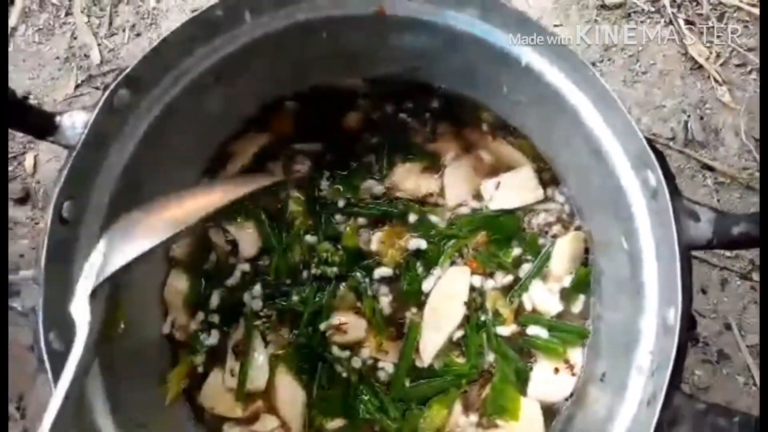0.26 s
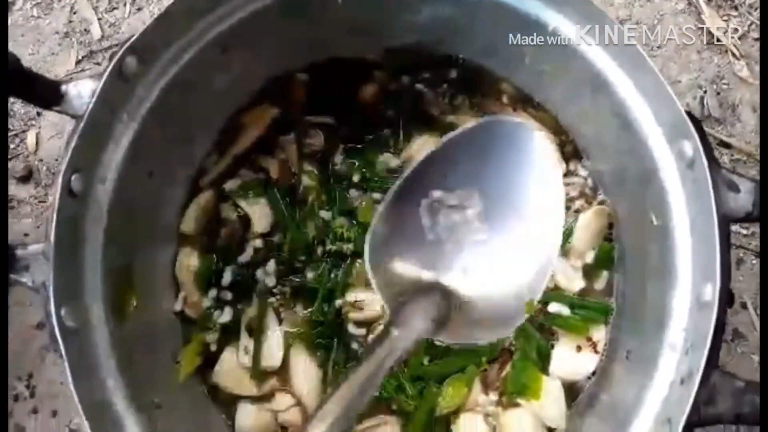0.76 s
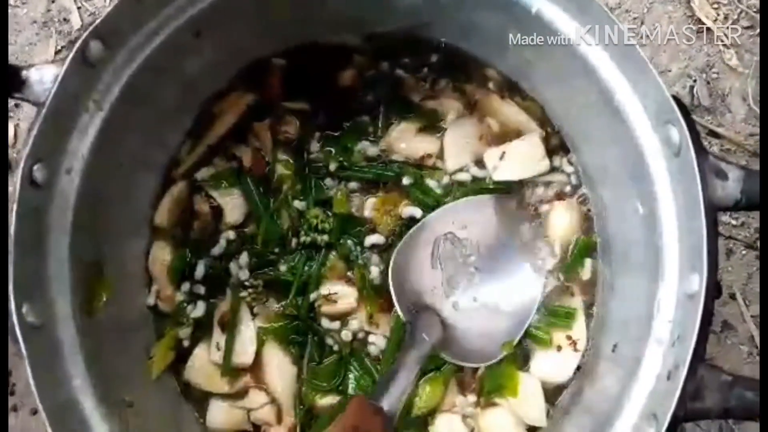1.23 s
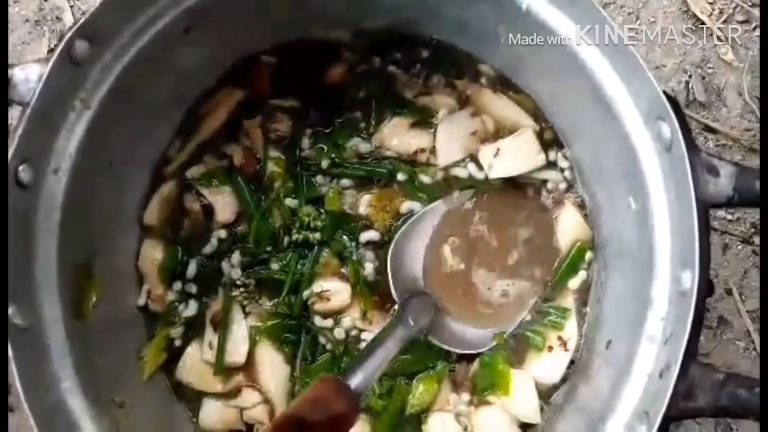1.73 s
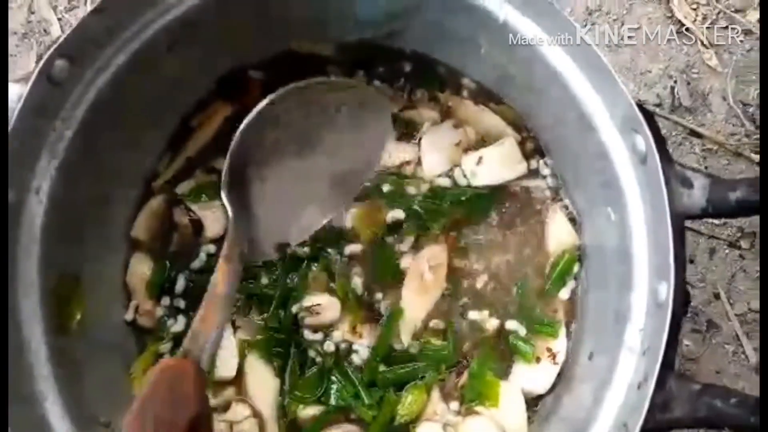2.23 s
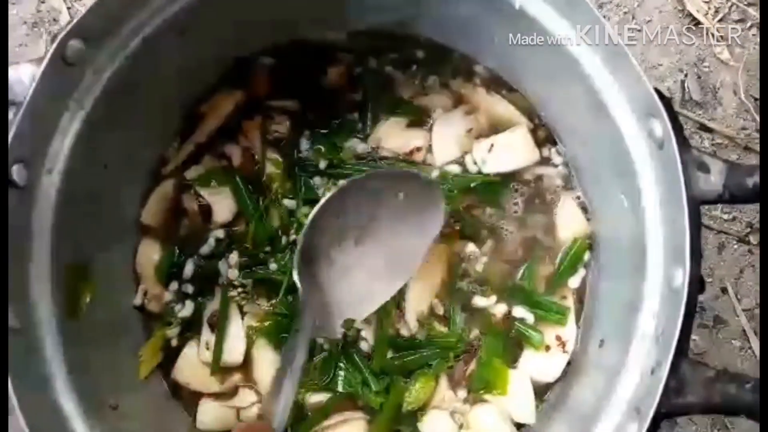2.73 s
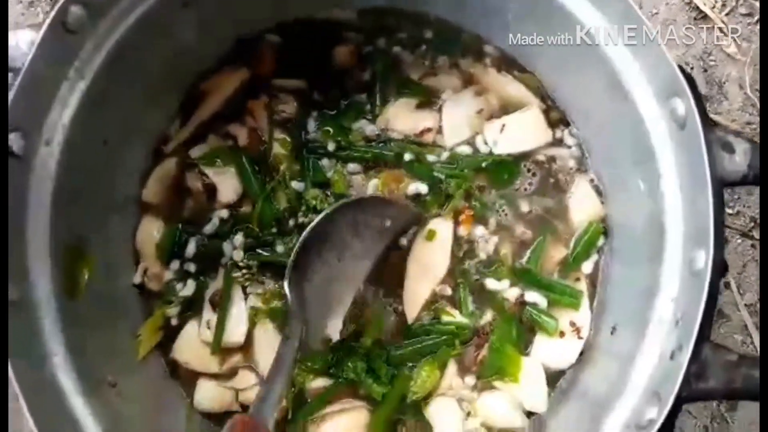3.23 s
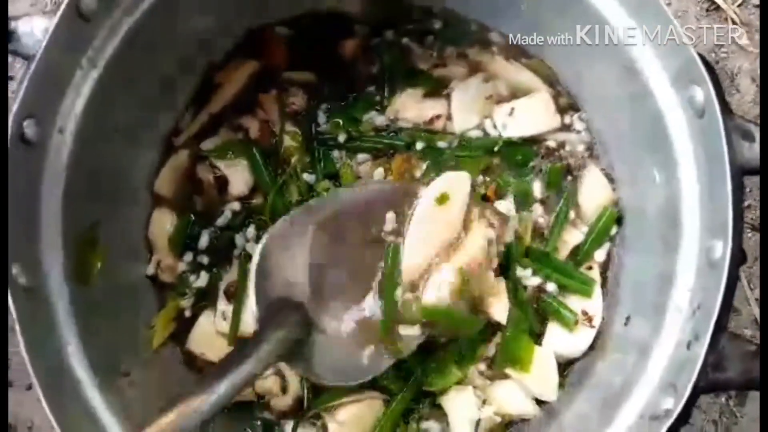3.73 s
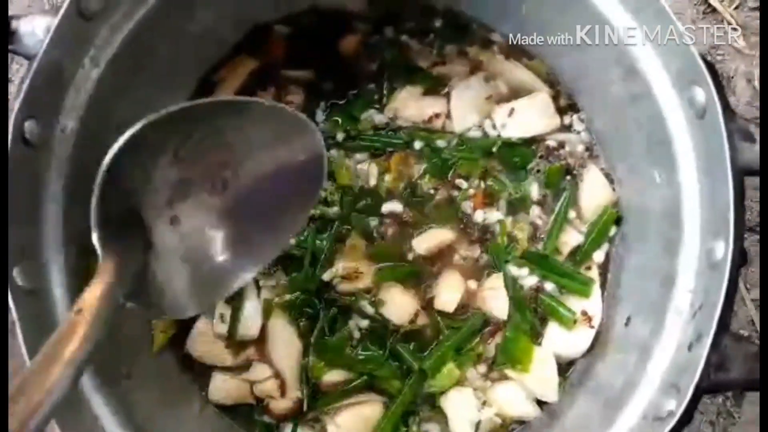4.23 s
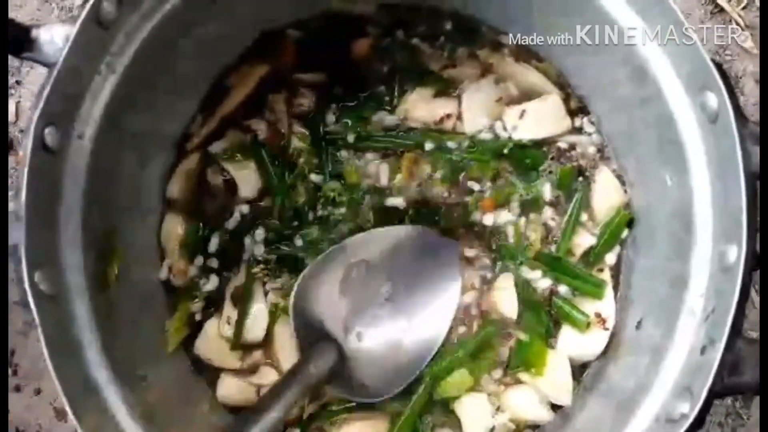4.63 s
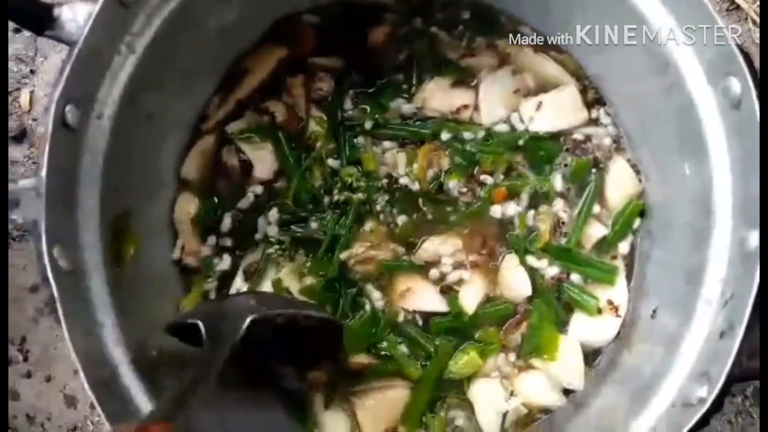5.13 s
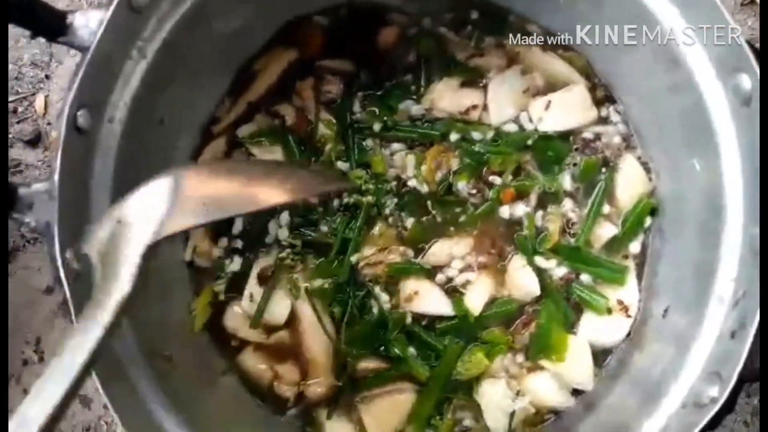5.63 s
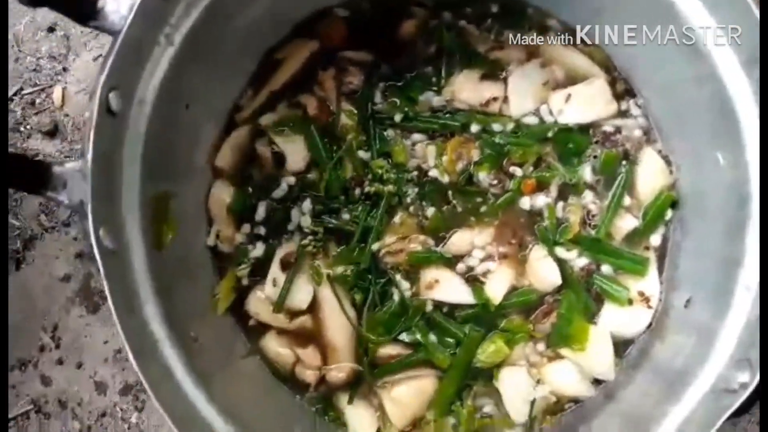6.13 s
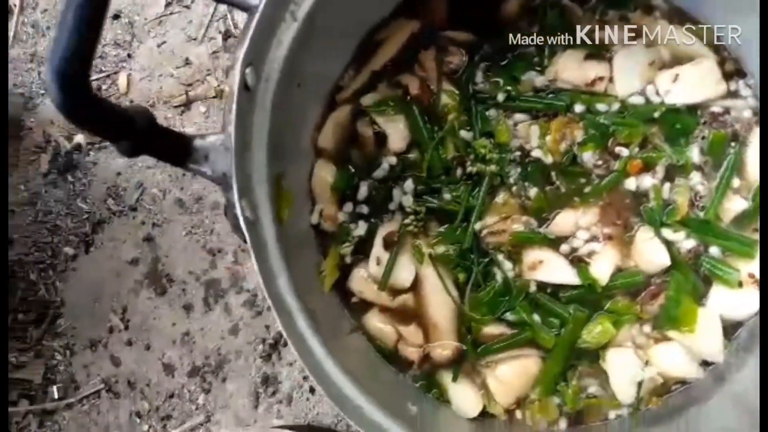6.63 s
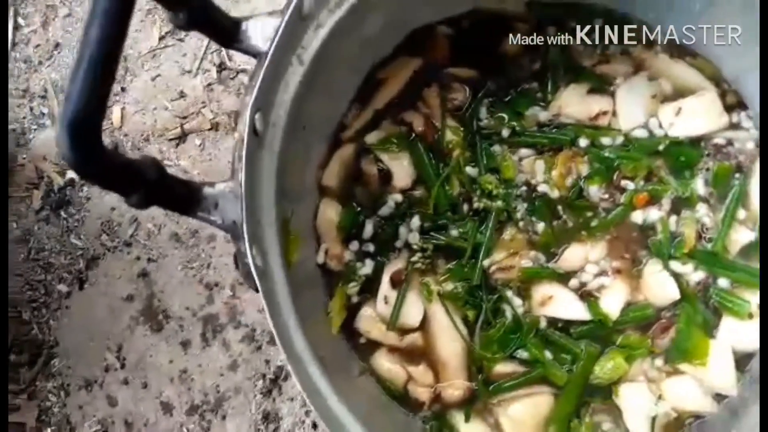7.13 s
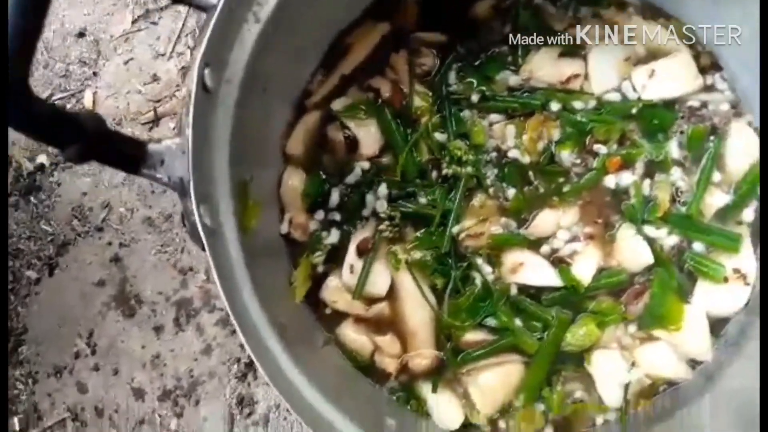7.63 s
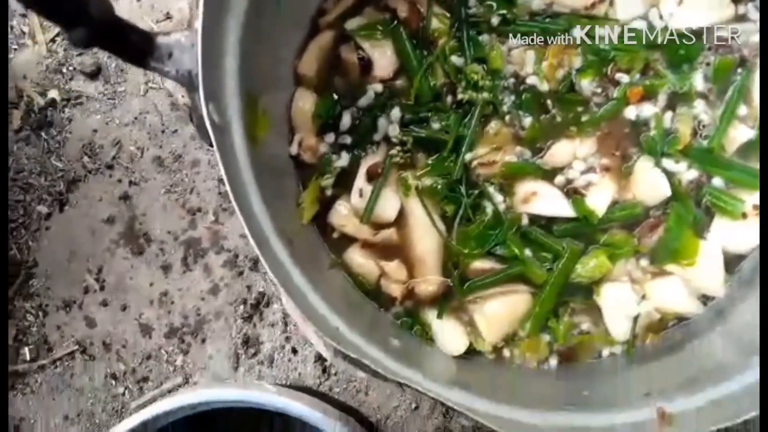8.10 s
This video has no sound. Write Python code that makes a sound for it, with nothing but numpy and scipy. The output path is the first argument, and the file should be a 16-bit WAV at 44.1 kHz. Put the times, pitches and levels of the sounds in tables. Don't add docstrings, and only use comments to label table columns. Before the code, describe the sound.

A gentle, hollow simmer runs throughout, slowly growing, in quiet open air with scattered thin bird whistles and chips. Soft ladle scrapes and tiny clicks lead to one sharp metallic knock. Later, bright metal tableware is struck beside the pot: a ringing bowl, rattling dishes, a short cup clack, rough scraping and a bouncing lid. The small close microphone sounds dry, with limited treble and light breeze rumble.

```python
import sys
import numpy as np
from scipy import signal
from scipy.fft import rfft, irfft
from scipy.io import wavfile

SR = 44100
rng = np.random.default_rng(int(sys.argv[2]) if len(sys.argv) > 2 else 0)


def generate_wav(sig):
    pcm = np.round(np.clip(np.atleast_2d(sig).T, -1, 1) * 32767).astype(np.int16)
    wavfile.write(sys.argv[1], SR, pcm)


def gain_from_db(level_db):
    decades = np.asarray(level_db, float) / 20
    return 10 ** decades


N = 368676

# [f/Hz, density/dB]
AIR = [(15, -56), (25, -30.5), (86, -25), (254, -27.5), (366, -26.5), (573, -11), (766, -10.5), (971, -28),
       (1440, -27), (12200, -34.5), (13500, -56)]
AIR_DB = -78.5
# [f/Hz, density/dB]
RUMBLE_SPECTRUM = [(15, -39), (25, -6), (64, -5), (102, 0), (150, -8.5), (172, -4), (220, -13),
                   (290, -45.5), (480, -120)]
# [t/s, level/dB, 20 dB rise/s, 20 dB fall/s]
PUFFS = [
    (3.14, -77.5, 0.1, 0.087),
    (3.44, -78, 0.2, 0.56),
    (4.2, -83.5, .5, 0.43),
    (4.57, -73, 0.13, 0.25),
    (4.94, -64, .07, 0.19),
    (6.31, -67, 0.06, .2),
    (6.72, -73.5, 0.2, 0.38),
    (7.85, -79, 0.3, 0.72),
]
CALM_DB = -95

# [t/s, length/s, level/dB]
RISERS = [
    (0.584, 0.17, -63),
    (2.222, .14, -64),
    (3.001, 0.17, -61),
]
RISER_FROM_HZ, RISER_TO_HZ, RISER_BEND = 3800, 6850, 1.7
# [t/s, length/s, f/Hz, level/dB]
HELD = [
    (.03, 0.034, 6900, -74),
    (.75, .063, 6800, -83),
    (2.33, 0.06, 6900, -78),
    (2.995, .13, 7020, -77),
    (5.062, .15, 7130, -78),
]
SAG_HZ_PER_S = 500
# [t/s, length/s, first f/Hz, last f/Hz, level/dB]
CHIPS = [
    (0.0, .02, 4540, 6500, -58.5),
    (1.025, 0.023, 5670, 7160, -54.5),
    (3.97, .045, 5850, 6600, -63),
    (4.205, 0.019, 5900, 5380, -63.5),
    (6.127, .019, 6380, 6600, -52.5),
    (6.856, 0.019, 4320, 4750, -58),
]
# [t/s, length/s, first f/Hz, last f/Hz, level/dB, bend]
DRIP = [
    (6.89, .022, 1000, 1450, -46, 1.1),
]
YARD_T60_S, TREES_T60_S = 0.36, 0.24

# [t/s, level/dB]
SIMMER = [(0.0, -64.5), (0.32, -66), (0.63, -62), (1.16, -59), (2.19, -59.5), (2.65, -57.5), (3.51, -55.5),
          (3.68, -59.5), (4.12, -60), (4.9, -55), (5.68, -57), (7.0, -55.5), (8.36, -56)]
# [f/Hz, density/dB]
BUBBLING = [(130, -61), (220, -19), (292, -22), (409, -8.5), (592, 2.5), (705, -1.5), (911, -18),
            (994, -28.5), (1100, -24), (1430, -53), (2420, -120)]
# [t/s, peak level/dB, f/Hz]
POPS = [(1.207, -42, 618), (1.516, -42.5, 516), (1.989, -46, 604), (2.461, -44, 600), (3.341, -48, 574),
        (3.96, -41.5, 592), (4.03, -44, 444), (4.244, -43.5, 606), (4.451, -45.5, 550), (4.481, -43, 630),
        (5.059, -42, 547), (5.084, -40.5, 570), (5.547, -46, 686), (5.69, -43, 545)]
# [f/Hz, width/Hz]
WALL = [
    (1190, 55),
    (1860, 80),
    (2360, 29),
]
# [t/s, peak level/dB, 20 dB fade/s]
RUBS = [
    [(.28, -77, .08), (1.38, -73, 0.14), (1.65, -76, 0.2), (2.17, -64.5, 0.18), (2.4, -77, 0.15),
     (2.69, -73, .1), (3.1, -75, .5), (3.57, -70.5, 0.65), (4.0, -72, 0.3), (4.25, -71, 0.4),
     (4.75, -72.5, 0.3), (5.1, -66, .5), (5.66, -69, 0.07), (6.05, -78.5, 1)],
    [(.93, -85.5, 0.6), (1.15, -78, 0.23), (3.02, -71.5, 0.2), (3.42, -73, 0.18), (4.84, -76, 0.37),
     (5.0, -66, 0.26), (5.29, -82, 0), (6.2, -83, 0.6)],
    [(1.65, -83, 0.1), (2.12, -85, 0.7), (2.92, -76, .3), (4.084, -73, 0.07), (5.0, -73, 0.3),
     (5.98, -83, 0.5)],
]
RUB_REST_DB = -97
# [t/s, peak level/dB, centre f/Hz, spread/octaves, crack level/dB]
TICKS = [(1.054, -53, 1700, .5, -80), (2.069, -51, 3780, 0.31, -54.5), (2.070, -56, 12300, .12, -83),
         (3.848, -47.5, 12400, .1, -82), (4.566, -48, 12900, .07, -80), (3.847, -37.5, 1760, 0.59, -45.5),
         (3.876, -58, 4200, 0.4, -58), (3.893, -40, 3000, 0.5, -55), (3.925, -58, 3630, 0.54, -64),
         (4.021, -66, 2190, 0.25, -52), (3.848, -52, 7100, .12, -80), (3.859, -52, 2200, .1, -80),
         (3.899, -57, 7200, .2, -65), (4.113, -62, 4500, .08, -85), (4.566, -46, 9800, .3, -80),
         (4.897, -30, 7800, .12, -70), (4.898, -36, 11000, .25, -70), (4.9145, -40, 7000, .3, -60),
         (4.079, -54, 2180, 0.078, -63), (4.089, -50, 2730, 0.16, -60), (4.104, -56, 11900, .12, -78),
         (5.008, -52.5, 3020, 0.59, -60), (5.035, -54, 2770, 0.46, -61), (5.275, -63, 1700, 0.078, -82),
         (8.002, -49, 9600, 0.2, -51), (8.346, -56, 3730, 0.11, -52)]
TICK_RING_S, TICK_CYCLES = 0.016, 73

# [t/s, level/dB, 20 dB rise/s, 20 dB fall/s]
DRAG = [(7.01, -57.5, 0.4, 0.24), (7.31, -52, 0.1, 0.3), (7.35, -52.5, .2, .07), (7.47, -62.5, .07, .5),
        (7.61, -51.5, .3, .4), (7.69, -50.5, 0.3, 0.08), (7.809, -43, 0.1, 0.0091), (7.98, -56, .3, 0.11),
        (8.17, -56, 0.2, .15), (8.26, -56, 0.2, 0.028), (8.31, -50, 0.1, 0.084)]
# [f/Hz, density/dB]
DRAG_TONE = [(88, -47), (150, -7.5), (254, -0.5), (564, -15), (870, 0.5), (983, 6.5), (1420, -5),
             (2070, -7), (2430, 3), (3800, -37), (4940, -54), (8360, -120)]
# [f/Hz, density/dB]
DRAG_GRIT = [(2060, -26), (3200, -6), (3830, -12), (4460, 0), (5000, -2), (5850, -23), (6300, 2),
             (6630, -6.5), (7090, -0.5), (7980, -2), (10500, -10.5), (12500, -6), (13500, -25)]
# [f/Hz, width/Hz, level/dB]
GRIT_TONES = [(3250, 83, -0.5), (3820, 20, -16), (4100, 30, -13), (4300, 18, -7), (4360, 38, -8),
              (4560, 51, -2), (5150, 100, -4), (5610, 110, -20), (6500, 81, 0.5), (6760, 25, -8),
              (7680, 35, -4), (8240, 38, -6), (8870, 62, -15), (9300, 42, -12), (9700, 31, -21),
              (9900, 81, -18), (10700, 86, -19), (11300, 43, -29), (12300, 140, -25)]
GRIT_DB, GRIT_FOLLOWS = -59, 1.45

# [t/s, peak level/dB]
JOLTS = [
    (6.615, -52),
    (6.724, -49),
    (6.90, -58),
    (7.219, -55),
    (7.812, -58),
]
# [f/Hz, level/dB, t60/s]
BOWL_HUM = [(950, -8, .7), (1547, 0, 1.2), (2178, -7, .6), (2494, -6, .5), (2690, -8, .6), (2943, -12, .4),
            (4046, -18, .3)]

# [f/Hz, density/dB]
CRACK = [(2710, -36), (4600, -11), (4980, -9.5), (5460, -13), (6540, 0), (6910, -3), (7940, -3),
         (10400, -12.5), (12200, -14), (13300, -23.5), (13900, -51.5)]
# [t/s, body level/dB, knock level/dB, crack level/dB, rattle/s]
POT_KNOCKS = [
    (1.0511, -42, -61, -37.5, 0.049),
    (1.0634, -51, -67, -49.5, 0.018),
    (4.565, -36, -43.5, -36.5, 0.042),
    (4.5752, -45, -51, -46.5, 0.039),
]
LADLE_TAPS = [
    (4.8915, -41, -46, -70, 0.018),
    (4.8966, -7.5, -14.5, -16, 0.08),
    (4.914, -18, -31.5, -31, 0.03),
]
BOWL_HITS = [
    (6.3017, -5, -22, -10, 0.069),
    (6.3299, -21.5, -35.5, -32, 0.12),
]
DISH_HITS = [(6.6126, -21.5, -38, -25, 0.06), (6.6178, -17.5, -35, -27.5, 0.14),
             (6.6338, -18.5, -17, -37, 0.026), (6.640, -20, -24, -44, 0.21),
             (6.7221, -15.5, -32, -19, 0.033), (6.7245, -13.5, -28, -17, 0.026),
             (6.730, -12.5, -26, -27, 0.044), (6.737, -19, -27, -28.5, 0.11),
             (6.7565, -19, -28, -26, 0.045), (6.767, -23.5, -28, -39, 0.072),
             (6.7805, -26, -34.5, -37, 0.14), (8.096, -24, -29, -32.5, 0.15),
             (8.2709, -32, -41.5, -46, 0.13)]
LID_HITS = [
    (7.803, -38, -34, -60, 0.027),
    (7.8075, -23, -23, -32, 0.026),
    (7.8105, -7.5, -12.5, -17.5, 0.06),
    (7.8163, -6.5, -25, -21, 0.068),
    (7.8274, -10, -27, -26.5, 0.075),
    (7.8414, -17, -25, -41, 0.082),
    (7.8539, -19, -25, -44, 0.1),
    (7.8716, -21.5, -28, -43, 0.13),
    (7.8974, -30, -30, -56, 0.056),
]
CUP_HITS = [
    (7.2125, -47, -41, -70, .03),
    (7.2172, -14, -18.5, -36, 0.038),
    (7.2213, -14, -28.5, -33.5, 0.072),
    (7.236, -22.5, -44, -42, .09),
]
# [f/Hz, level/dB, t60/s]
LADLE = [(947, -23, 0.13), (1222, -1, 0.062), (1766, 1, 0.068), (2010, -7, .05), (2304, -2, 0.055),
         (2460, -7, .05), (2665, -27, 0.11), (3031, -25, 0.097), (5093, -30, 0.069), (6132, -12, 0.059),
         (7779, -42, 0.13)]
# [f/Hz, level/dB, t60/s]
BOWL = [(290, -36, 2.4), (668, -32, 1.6), (829, -31, .36), (953, -27, .33), (1545, -24, 1.1),
        (1552.5, -18, .45), (1760, -37, .5), (1900, -38, .5), (2180, -4, .48), (2390, -8, .14),
        (2560, -33, .4), (2767, -15, .32), (2781, -21, .25), (2939, -20, .38), (2951, -24, .36),
        (3241, -10, .16), (3252, -38, .6), (3365, -20, .19), (3374, -39, .6), (4043, -26, .22),
        (4447, -31, .26), (4888, -26, .18), (5130, -18, .076), (6342, -13, .1), (6476, -21, .13),
        (7020, -29, .15), (7763, -15, .08), (8899, -18, .07)]
# [f/Hz, level/dB, t60/s]
DISH = [(608, -6, .17), (1082, -5, .15), (1200, -8, .1), (1545, -22, .5), (1771, -4, .14), (1938, -5, .15),
        (2309, 0, .18), (2385, -3, .22), (2509, 0, .23), (2620, -5, .15), (2686, -19, .45),
        (2794, -10, .18), (4640, -16, .18), (5329, -22, .2), (5674, -20, .14), (6164, -16, .11),
        (7025, -14, .12), (8877, -19, .1)]
# [f/Hz, level/dB, t60/s]
LID = [(678, -18, 0.26), (1147, -24, 0.42), (1545, -23, 0.6), (2175, -29, 0.71), (2358, 0, 0.1),
       (2422, -13, 0.25), (2492, -3, 0.2), (2686, -25, 0.72), (2789, -18, 0.4), (2939, -13, 0.28),
       (3214, -17, 0.24), (3391, -28, 0.22), (3682, -31, 0.23), (3817, -23, 0.19), (4043, -17, 0.22),
       (4409, -17, 0.13), (4829, -19, 0.13), (5125, -25, 0.2), (6643, -20, 0.18), (7833, -42, 0.28)]
# [f/Hz, level/dB, t60/s]
CUP = [(1200, -29, 0.15), (1680, -17, 0.16), (1895, -23, 0.15), (2500, -11, 0.13), (2519, 0.5, 0.054),
       (2740, -16, 0.21), (3300, -31, 0.1), (3811, -23, 0.09), (4100, -13, 0.11), (4231, -11, 0.067),
       (4500, -16, 0.078), (5685, -37, 0.14), (6261, -28, 0.14), (7860, -30, 0.088),
       (1545, -28.5, 0.49), (2690, -24, 0.39), (7900, -14, .05), (6500, -15, 0.068)]


def rms_one(x):
    return x / np.sqrt(np.mean(x ** 2) + 1e-20)


def peak_one(x):
    return x / np.max(np.abs(x))


def drift(rate):
    r = np.exp(-80 * np.pi * rate / SR)
    slow = signal.lfilter([1], [1, -2 * r, r * r], rng.standard_normal(N // 40 + 2002))[2000:]
    return np.interp(np.arange(N) / 40, np.arange(len(slow)), rms_one(slow))


def swells(rows, rest_db):
    t = np.arange(0, N + 64, 64) / SR
    levels = [np.full(len(t), rest_db)]
    for s, peak_db, *sides in rows:
        distance = np.where(t < s, (s - t) / sides[0], (t - s) / sides[-1])
        levels.append(peak_db - 20 * distance)
    return np.interp(np.arange(N) / SR, t, np.max(levels, axis=0))


def coloured(x, spectrum):
    hz, level_db = np.transpose(spectrum)
    bins = np.maximum(np.arange(len(x) // 2 + 1) * SR / len(x), 1)
    weight = gain_from_db(np.interp(np.log(bins), np.log(hz), level_db, left=-90, right=-90))
    return rms_one(irfft(rfft(x) * weight, len(x)))


def band(x, low_hz, high_hz):
    sos = signal.butter(2, [low_hz, min(high_hz, .45 * SR)], "band", fs=SR, output="sos")
    return signal.sosfilt(sos, x)


def ring(clicks, hz, t60):
    r, w = gain_from_db(-60 / (t60 * SR)), 2 * np.pi * hz / SR
    return signal.lfilter([0, np.sin(w)], [1, -2 * r * np.cos(w), r * r], clicks + 1e-18)


def grains(size, per_s, spread_db):
    strength = gain_from_db(spread_db * np.minimum(rng.exponential(1, size), 5))
    sign = rng.choice([-1, 1], size)
    return strength * sign * (rng.random(size) < per_s / SR)


def contact(length, rattle):
    t = np.arange(int(length * SR)) / SR
    force = grains(len(t), 1500, spread_db=3.0) + .6 * rng.standard_normal(len(t))
    shape = gain_from_db(-60 * t / max(rattle, .004)) + 2.4 * np.exp(-t / 0.001)
    return force * shape * np.minimum(t / 0.0013, 1) ** 2


def crack(force):
    colour = coloured(signal.unit_impulse(256, 128), CRACK)
    return peak_one(np.convolve(force, colour)[128:128 + len(force)])


def echoes(x, t60, cut_hz, hold):
    t = np.arange(int(.8 * SR)) / SR
    shape = gain_from_db(-60 * np.maximum(t - hold, 0) / t60) * np.minimum(t / 0.0027, 1)
    tail = band(rng.standard_normal(len(t)), 230, cut_hz) * shape
    return signal.fftconvolve(x, tail / np.sqrt(np.sum(tail ** 2)))[:N]


def open_air():
    return gain_from_db(AIR_DB + 4.5) * coloured(rng.standard_normal(N), AIR)


def breeze():
    rumble = coloured(rng.standard_normal(N), RUMBLE_SPECTRUM) * gain_from_db(2 * drift(5))
    return gain_from_db(swells(PUFFS, CALM_DB) + 11.0) * rms_one(rumble)


def bird_notes():
    risers = [(s, length, RISER_FROM_HZ, RISER_TO_HZ, db, RISER_BEND) for s, length, db in RISERS]
    held = [(s, length, hz, hz - SAG_HZ_PER_S * length, db, 1) for s, length, hz, db in HELD]
    return risers + held + [(*chip, 1) for chip in CHIPS]


def glides(notes, waver_db):
    out, waver = np.zeros(N), gain_from_db(waver_db * drift(40))
    for s, length, first_hz, last_hz, level_db, bend in notes:
        u = np.linspace(0, 1, int(length * SR))
        phase = 2 * np.pi * np.cumsum(first_hz + (last_hz - first_hz) * u ** bend) / SR
        out[round(s * SR):][:len(u)] += gain_from_db(level_db) * np.sin(phase) * np.sin(np.pi * u) ** 0.21
    return out * waver


def simmer():
    collapses = grains(N, 500 * gain_from_db(4 * drift(8.3)), spread_db=1.5)
    pitches, dealt = np.geomspace(330, 950, 16), rng.integers(0, 16, N)
    large_db, small_db = 5 * drift(3.4), 5 * drift(4.1)
    lean = np.abs(np.linspace(-1, 1, 16))
    rings = np.zeros(N)
    for k, hz in enumerate(pitches):
        share_db = lean[k] * (large_db if k < 8 else small_db)
        rings += ring(collapses * (dealt == k) * gain_from_db(share_db), hz, 12.0 / hz)
    water = rms_one(rings) + 0.69 * rms_one(band(rng.standard_normal(N), 180, 1300))
    s, level_db = np.transpose(SIMMER)
    water = gain_from_db(np.interp(np.arange(N) / SR, s, level_db)) * coloured(water, BUBBLING)
    for s, peak_db, hz in POPS:
        burst = ring(band(signal.unit_impulse(SR // 4), hz / 1.4, hz * 1.4), hz, 18.0 / hz)
        water[round(s * SR):][:SR // 4] += gain_from_db(peak_db - 3.0) * peak_one(burst)
    return water


def stirring():
    rub, out = grains(N, 1400, spread_db=4.5), np.zeros(N)
    for (hz, width_hz), strokes in zip(WALL, RUBS):
        t60 = 2.2 / width_hz / 2
        tone = ring(ring(rub, hz, t60), hz, t60)
        out += gain_from_db(swells(strokes, RUB_REST_DB) - 1.5 + 3 * drift(12)) * rms_one(tone)
    return out


def ticks():
    out = np.zeros(N + SR)
    for s, peak_db, hz, octaves, crack_db in TICKS:
        force = contact(.15, TICK_RING_S + TICK_CYCLES / hz)
        ratio = 2 ** max(octaves, .03)
        patch = band(band(force, hz / ratio, hz * ratio), hz / ratio, hz * ratio)
        sound = gain_from_db(peak_db) * peak_one(patch) + gain_from_db(crack_db + 0.5) * crack(force)
        out[round(s * SR):][:len(force)] += sound
    return out[:N]


def dragging():
    drag_db = swells(DRAG, rest_db=-90)
    grit_db = GRIT_DB + GRIT_FOLLOWS * (drag_db + 53)
    start = round(6.8 * SR)
    grit = grains(N - start, 3000 * gain_from_db(2.8 * drift(25)[start:]), spread_db=2.0)
    body = sum(gain_from_db(db) * ring(grit, hz, t60 * 3.8) for hz, db, t60 in LID)
    tone = coloured(grit, DRAG_TONE) + 0.54 * rms_one(body)
    high = 1.3 * coloured(grit, DRAG_GRIT)
    for hz, width_hz, level_db in GRIT_TONES:
        wander_db = level_db * 0.91 - 5 + 3.6 * drift(8.3)[start:]
        high += gain_from_db(wander_db) * rms_one(ring(grit, hz, 2.2 / max(width_hz, 15)))
    drag = gain_from_db(drag_db[start:] - 1.5) * tone + gain_from_db(grit_db[start:]) * rms_one(high)
    return np.r_[np.zeros(start), drag]


def humming():
    start = round(6.6 * SR)
    out, chance = np.zeros(N), rng.normal(0, 2.0, (len(JOLTS), len(BOWL_HUM)))
    s, peak_db = np.transpose(JOLTS)
    for (hz, level_db, t60), vary_db in zip(BOWL_HUM, chance.T):
        clicks = np.zeros(N - start)
        clicks[(s * SR).astype(int) - start] = gain_from_db(peak_db + level_db + vary_db)
        out[start:] += ring(clicks, hz, t60)
    return out


def blows(hits, modes, ring_db, noise_db, damping, split_hz, twin, size, thud_db, touch_s, crack_s):
    out = np.zeros(N + SR)
    for s, body_db, knock_db, crack_db, rattle in hits:
        force = contact(size, rattle)
        samples = np.arange(len(force))
        noise = band(force, 2100, 2860) + .5 * band(force, 1100, 4400)
        thud = band(band(force, 260, 1100), 260, 1100)
        knock = band(band(force, 780, 1700), 780, 1700)
        sound = gain_from_db(body_db + noise_db) * peak_one(noise)
        sound += gain_from_db(knock_db + thud_db) * peak_one(thud)
        sound += gain_from_db(knock_db + 1) * peak_one(knock)
        sound += gain_from_db(crack_db + 6) * crack(force * np.exp(-samples / (crack_s * SR)))
        touch = force * np.exp(-samples / (touch_s * SR))
        body = 1e-9
        for hz, level_db, t60 in modes:
            pair = ring(touch, hz, t60 / damping) + twin * ring(touch, hz + split_hz, t60 / damping)
            reach_db = min(crack_db - body_db + 8, 0) * .55 * (hz > 4000)
            body = body + gain_from_db(level_db + reach_db) * peak_one(pair)
        sound += gain_from_db(body_db + ring_db) * peak_one(body)
        hand = np.minimum(np.linspace(6, 0, len(force)), 1)
        out[round(s * SR):][:len(force)] += sound * hand
    return band(out[:N], 170, 19000)


def scene():
    drip = glides(DRIP, waver_db=0)
    birds = glides(bird_notes(), waver_db=3)
    light = ticks() + blows(POT_KNOCKS, LADLE, ring_db=-1.5, noise_db=2.0, damping=2.4, split_hz=21,
                            twin=0.26, size=.2, thud_db=12.5, touch_s=.03, crack_s=.04)
    pot = blows(LADLE_TAPS, LADLE, ring_db=1.0, noise_db=-6.0, damping=1.1, split_hz=30,
                twin=.4, size=.2, thud_db=-8, touch_s=.011, crack_s=0.0072)
    dishes = blows(BOWL_HITS, BOWL, ring_db=-4.2, noise_db=-6, damping=0.8, split_hz=9,
                   twin=0.12, size=.38, thud_db=0.5, touch_s=0.0022, crack_s=.045)
    dishes += blows(DISH_HITS, DISH, ring_db=0, noise_db=-2.5, damping=1.15, split_hz=35.3,
                    twin=1.0, size=.35, thud_db=-16.0, touch_s=.015, crack_s=0.028)
    dishes += blows(LID_HITS, LID, ring_db=-3.5, noise_db=-2, damping=1.12, split_hz=35.6,
                    twin=0.3, size=.45, thud_db=-42, touch_s=0.011, crack_s=.025)
    dishes += blows(CUP_HITS, CUP, ring_db=-3, noise_db=-5, damping=0.73, split_hz=64,
                    twin=0.38, size=.4, thud_db=-26, touch_s=0.0026, crack_s=.02)
    wet = gain_from_db(-13) * light + gain_from_db(-25) * band(pot, 2300, 14000) + gain_from_db(-21.5) * dishes
    near = band(light + pot, 340, 19000) + dishes + drip
    near += echoes(wet, YARD_T60_S, cut_hz=12000, hold=0.023)
    far = 0.36 * birds + gain_from_db(-3) * echoes(birds, TREES_T60_S, cut_hz=25000, hold=0.055)
    background = open_air() + breeze() + far
    return (background + simmer() + stirring() + dragging() + humming() + near)[None]


def roll_off(x):
    return signal.sosfilt(signal.butter(12, 14260, fs=SR, output="sos"), x)


def record(dry):
    rounded = .7 * np.tanh(dry / .7)
    low_pass = signal.cheby2(16, 50, 13900, fs=SR, output="sos")
    return roll_off(signal.sosfilt(low_pass, rounded))


dry = scene()
out = record(dry)
generate_wav(out)
```